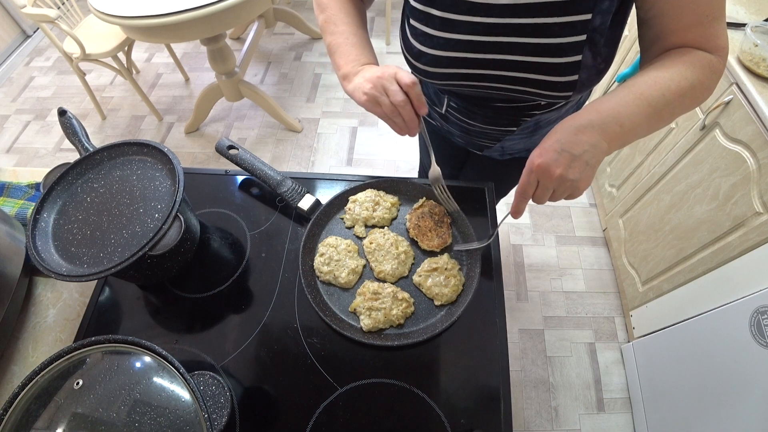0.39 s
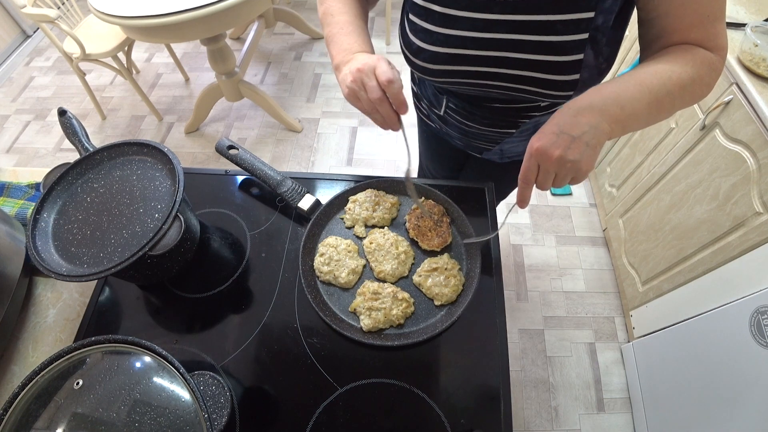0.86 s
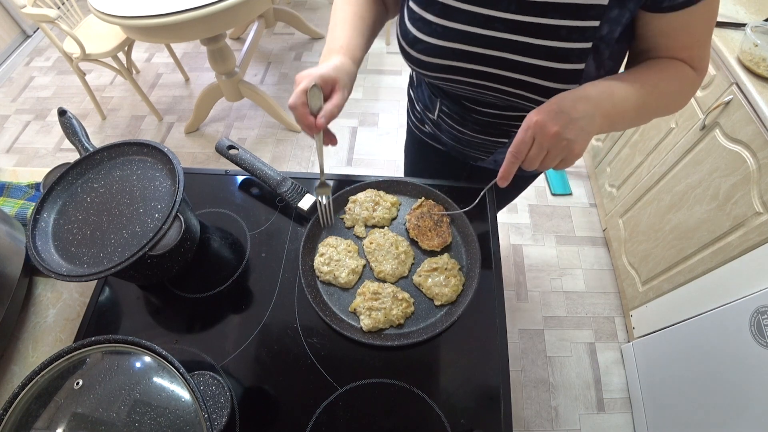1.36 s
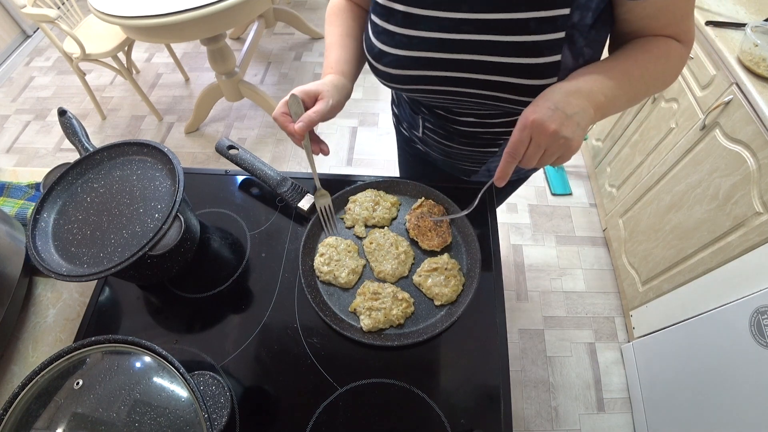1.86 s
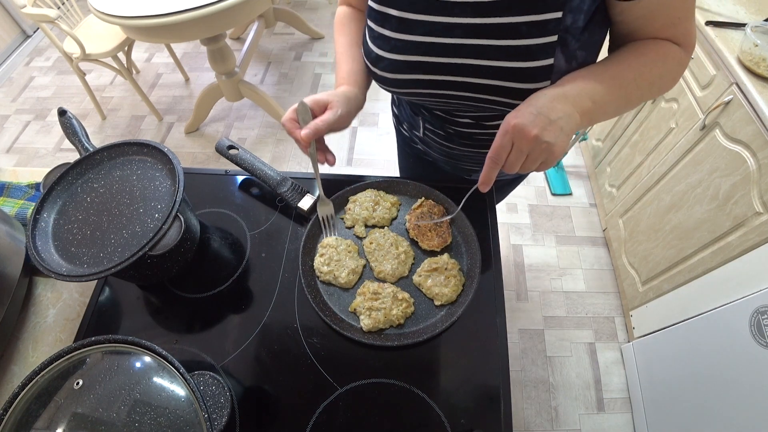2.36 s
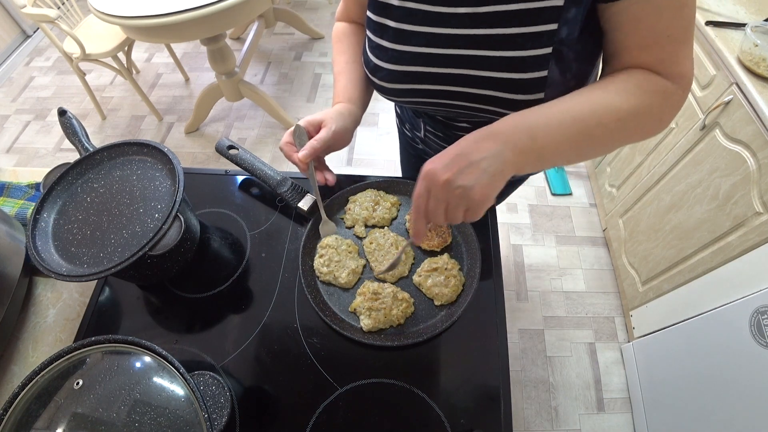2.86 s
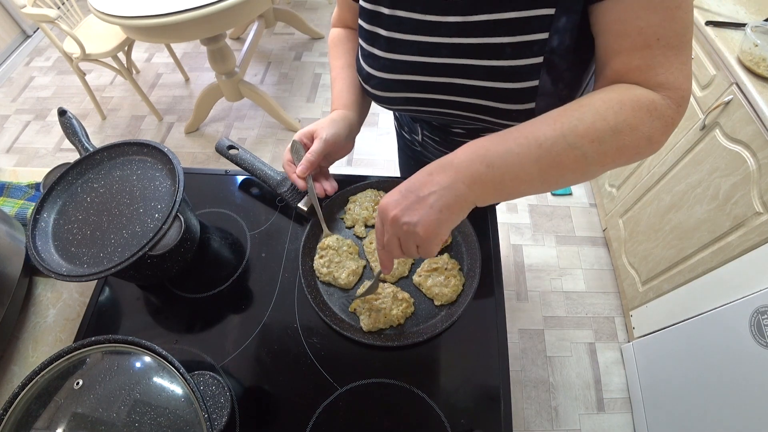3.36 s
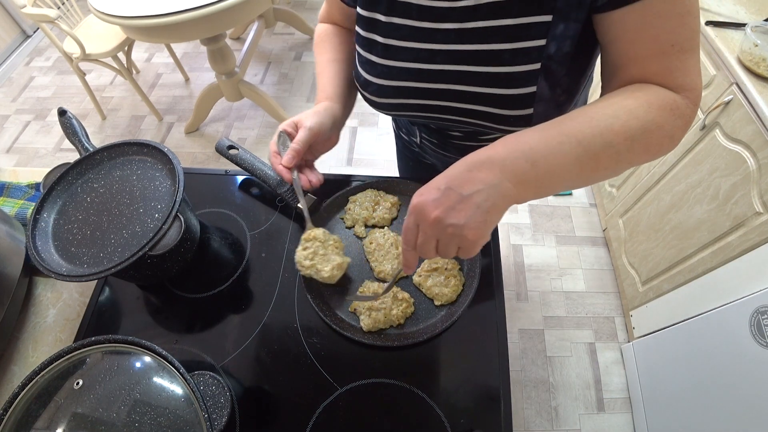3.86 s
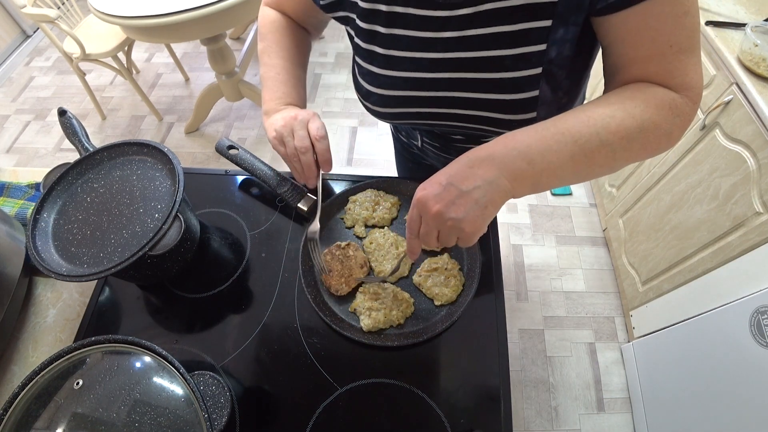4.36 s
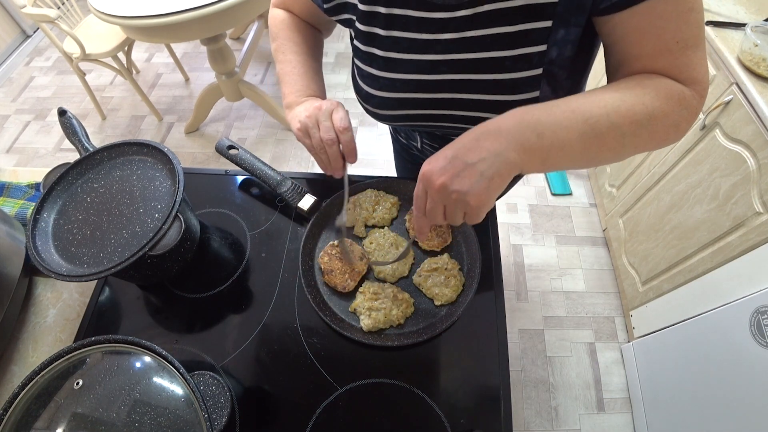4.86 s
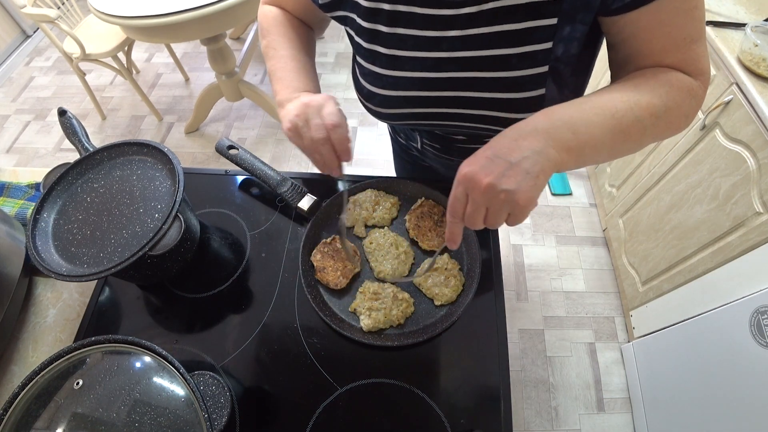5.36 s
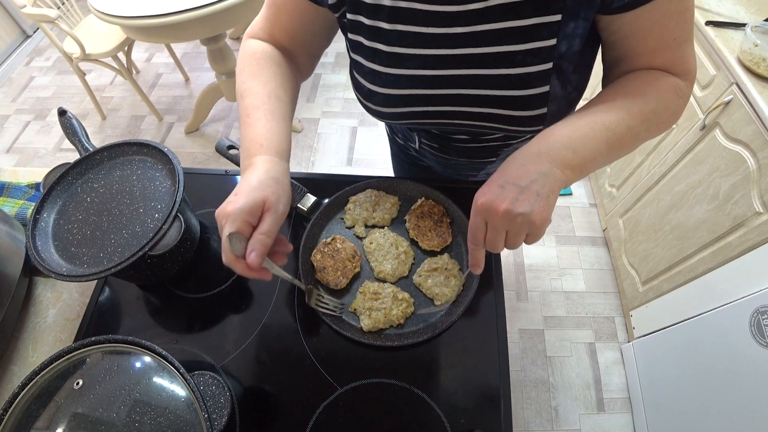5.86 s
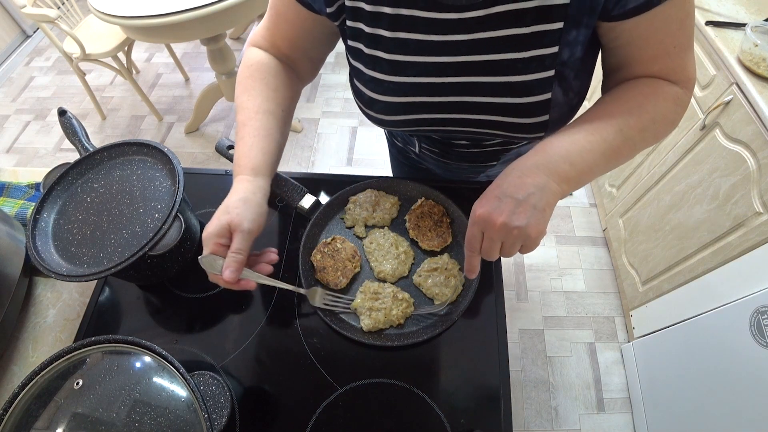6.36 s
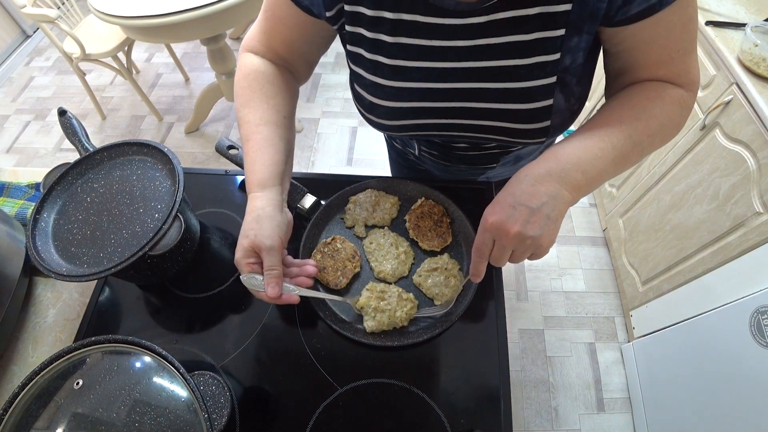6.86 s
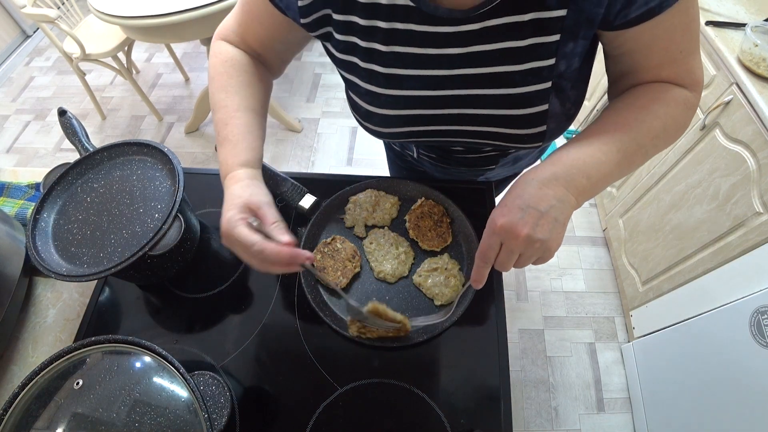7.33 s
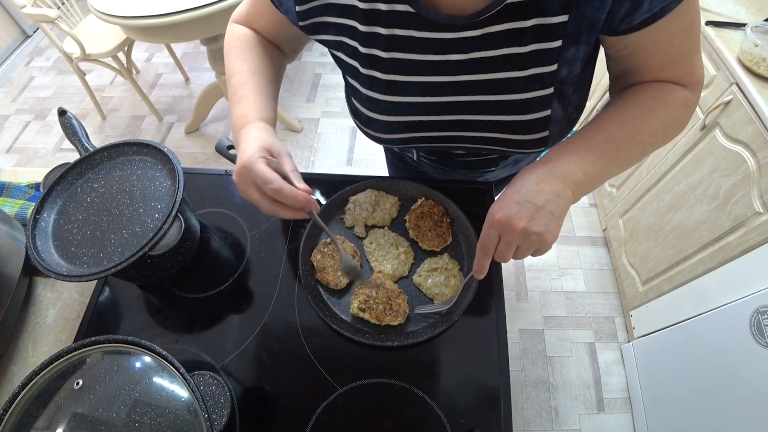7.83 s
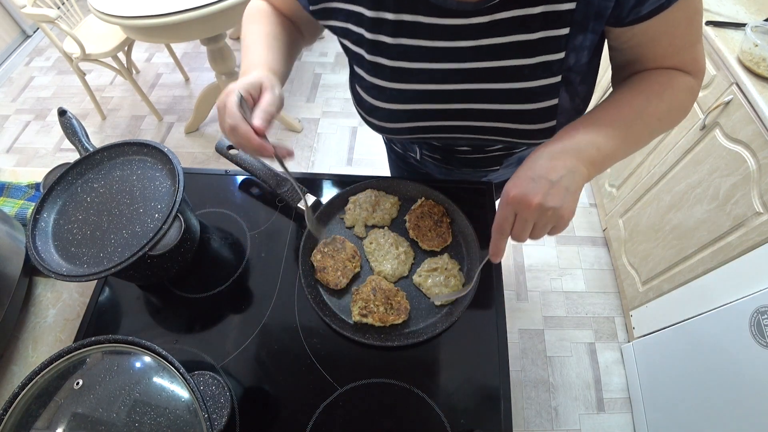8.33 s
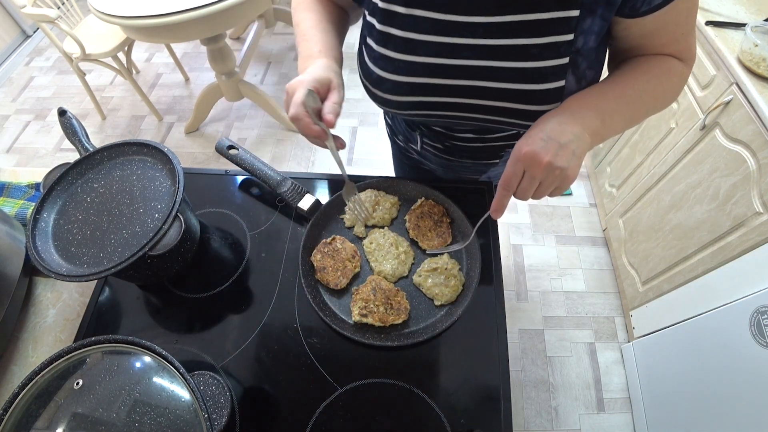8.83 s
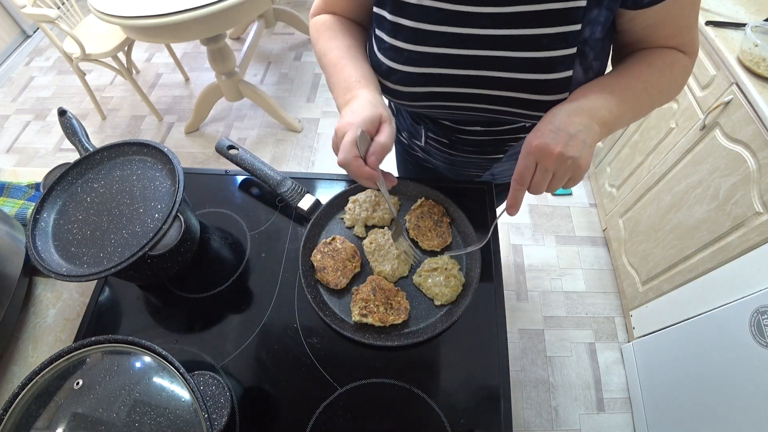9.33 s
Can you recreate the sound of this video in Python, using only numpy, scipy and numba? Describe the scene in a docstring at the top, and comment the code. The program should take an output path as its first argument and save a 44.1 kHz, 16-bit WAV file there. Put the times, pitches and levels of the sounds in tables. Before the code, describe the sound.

Close, bright frying crackle swells and eases as fritters are flipped, dotted with crisp pops and small metallic utensil knocks in a quiet kitchen.

```python
"""A kitchen, heard in stereo close above a pan of frying fritters. Steam bubbles burst as thousands of tiny damped
sines over hiss, a crackle that flares when a fritter is turned and then dies down. Drops pop as short clicks
with a patter of droplets; forks tap and scrape the pan and the hob thuds, as noisy contacts ringing decaying modes.
A fridge hums as wavering sines over low room rumble of filtered noise."""
import sys
import numpy as np
from scipy import signal
from scipy.fft import rfft, irfft
from scipy.io import wavfile
from scipy.ndimage import uniform_filter1d
from numba import njit

SR = 44100
rng = np.random.default_rng(int(sys.argv[2]) if len(sys.argv) > 2 else 0)


def boost_factor(decibels):
    """Convert a level in decibels to a linear amplitude factor."""
    exponent = np.asarray(decibels, float) / 20
    return 10 ** exponent


def bounce(signal):
    """Save signal as a 16-bit WAV file at the path given by the first command-line argument."""
    frames = np.transpose(np.atleast_2d(signal))
    limited = np.clip(frames, -1, 1)
    pcm = np.round(limited * 32767).astype(np.int16)
    wavfile.write(sys.argv[1], SR, pcm)


N = 428211


def colour(x, points):
    """Minimum-phase filter through (Hz, dB) points, from the cepstrum of the log gain."""
    size = 2 ** 15
    hz, db = np.transpose(points)
    bin_hz = np.arange(size // 2 + 1) * SR / size
    gain_db = np.interp(np.log(bin_hz + 1), np.log(hz), db)
    cepstrum = irfft(np.log(boost_factor(gain_db)))
    # fold onto positive time: causal
    cepstrum[1:size // 2] *= 2
    cepstrum[size // 2 + 1:] = 0
    response = irfft(np.exp(rfft(cepstrum)))[None, :size // 2]
    return signal.fftconvolve(np.atleast_2d(x), response, axes=1)[:, :N]


def walk(rate_hz):
    """Random levels held 1 / rate_hz s and slewed twice; rms 1."""
    hold = int(SR / rate_hz)
    steps = np.repeat(rng.standard_normal(N // 50)[:N // hold + 1], hold)
    smooth = uniform_filter1d(uniform_filter1d(steps, hold), hold)[:N]
    return smooth / np.sqrt(np.mean(smooth ** 2))


@njit
def grains(start_s, hz, tau_s, size):
    """Each grain is a damped sine that starts between samples."""
    out = np.zeros(N)
    for k in range(len(start_s)):
        first = int(start_s[k] * SR) + 1
        rate = 2j * np.pi * hz[k] / SR - 1 / (tau_s[k] * SR)
        z = size[k] * np.exp(rate * (first - start_s[k] * SR))
        turn = np.exp(rate)
        for j in range(first, min(N, first + int(6 * tau_s[k] * SR))):
            out[j] += z.imag
            z *= turn
    return out


def ring(modes, tilt_db):
    """Half a second of decaying cosines: the modes' answer to one blow."""
    t = np.arange(SR // 2) / SR
    hz, db, t60_s = np.transpose(modes)[:, :, None]
    level_db = db + tilt_db(hz) - 60 * t / t60_s
    return np.sum(boost_factor(level_db) * np.cos(2 * np.pi * hz * t), axis=0)


# Echoes off pan wall and hob. Each row: delay left in s, delay right in s, level re direct in dB.
ECHOES = [(.0009, 0.0013, -33), (.0017, 0.0013, -51.5), (.0023, 0.002, -18)]
ROOM_T60_S, ROOM_DB = 0.23, -12


def kitchen(x):
    """Direct sound, close echoes, and a diffuse decaying tail that differs between the ears."""
    t = np.arange(SR // 2) / SR
    build_up = 1 - np.exp(-t / 0.0052)
    tail = rng.standard_normal((2, len(t))) * boost_factor(-60 * t / ROOM_T60_S) * build_up
    tail = signal.lfilter([1], [1, -.5], tail)  # walls soak up treble
    response = boost_factor(ROOM_DB) * tail / np.sqrt(np.sum(tail ** 2, axis=1, keepdims=True))
    response[:, 0] = 1
    for *delay_s, db in ECHOES:
        delay = SR * np.array(delay_s)[:, None]
        response[:, :200] += boost_factor(db) * np.sinc(np.arange(200) - delay)
    return signal.fftconvolve(x[None], response, axes=1)[:, :N]


# Fritters landing raw side down. Each row: start in s, settling in s, flash of steam in dB, flash length in s,
# simmer in dB, cooling in dB per s, left minus right in dB.
FLIPS = [(0, 0.043, -28, 0.084, -29, 4, -0.8), (4.248, 0.025, -33.5, 0.61, -31.5, 2.5, 0.4),
         (7.387, 0.23, -34, 0.92, -30.5, 2, -0.1)]
# Tilt of each flash to small bright bubbles. Each entry: tilt in dB per half of the pitch range.
FLASH_TILT_DB = [14, 17, 4.5]
# A fork prises a fritter loose; the first time the sizzle dips by 2 dB, the second it keeps its level.
# Each row: start in s, end in s, level change in dB.
LIFTS = [(3.013, 3.98, -2), (6.797, 7.245, 0)]
LIFT_S = 0.067
FLASH_DIES_DB_PER_S, REST_DB = 38, -41


def heat():
    """Sizzle level, tilt and place: each landing flashes, then simmers and cools over the rest of the pan."""
    t = np.arange(N) / SR
    s, settle_s, flash_db, lasts_s, simmer_db, cools_db_per_s, balance_db = np.transpose(FLIPS)[:, :, None]
    landed = ((t - s) / settle_s).clip(0, 1) ** 2
    dying_db = FLASH_DIES_DB_PER_S * (t - s - lasts_s).clip(0)
    flash = landed * boost_factor(flash_db - dying_db) ** 2
    simmer = landed * boost_factor(simmer_db - cools_db_per_s * (t - s).clip(0)) ** 2
    fritter = flash + simmer
    power = fritter.sum(axis=0) + boost_factor(REST_DB) ** 2
    lift_db = sum(db * np.interp(t, [a, a + LIFT_S, b, b + LIFT_S], [0, 1, 1, 0]) for a, b, db in LIFTS)
    level_db = 10 * np.log10(power) + lift_db
    tilt_db = np.dot(FLASH_TILT_DB, flash) / power
    return level_db, tilt_db, np.sum(balance_db * fritter, axis=0) / power


# Colour of a burst as pan and microphone pass it. Each row: frequency in Hz, gain in dB.
BURST = [(300, -52.5), (550, -34), (690, -26), (1000, -15.5), (1450, -19), (2100, -15), (2750, -13),
         (3100, -12.5), (3550, -7.5), (3900, -7.5), (5000, -3.5), (6000, -1.5), (7400, 0.5), (8800, -4),
         (10900, -4.5), (14000, -22)]
# Pan resonances, also rung by the forks. Each row: frequency in Hz, relative level in dB, t60 in s.
PAN_MODES = [(253, 6, 0.051), (376, -10.5, 0.02), (447, 10, 0.0067), (546, -3.5, 0.018), (813, -3, 0.076),
             (1115, 9, 0.011), (1350, -9, 0.035), (1712, -2.5, 0.041), (1875, -3.5, 0.053),
             (2090, 3, 0.019), (2394, -4, 0.035), (3045, 2, 0.015), (3770, -5, 0.056), (4155, 2.5, 0.03),
             (4620, -3, 0.023), (5030, -9.5, 0.031), (6050, -1, 0.0093), (7640, -1.5, 0.0075)]
PLACES, BURSTS_PER_PLACE = 4, 14000


def sizzle(level_db, tilt_db):
    """Thousands of tiny bursts a second over steam hiss; hot fat bursts evenly, cooling fat in scattered spits."""
    cool_db = level_db.max() - level_db
    # a spit starts at once and dies within a few ms
    spit_s, spit_luck = rng.random((1500, 2)).T
    spit_size = boost_factor(-5.0 * np.log(spit_luck).clip(-3))
    spits = np.bincount((spit_s * N).astype(int), spit_size, N)
    spits = signal.lfilter([1], [1, -np.exp(-1 / (0.0069 * SR))], spits)
    activity = 3.5 + (0.032 + 0.086 * cool_db) * spits
    when, pitch, luck, sign = np.moveaxis(rng.random((PLACES, BURSTS_PER_PLACE, 4)), 2, 0)
    at = (when * N).astype(int)
    # a few bursts are much larger than the rest, more so in cooling fat
    luck_db = -(3.5 + 0.047 * cool_db[at]) * np.log(luck)
    burst_db = np.minimum(luck_db, 11.5 + .5 * cool_db[at]) + 2 * (pitch - 1.0) * tilt_db[at]
    size = boost_factor(burst_db) * activity[at] * np.sign(sign - .5)
    crackle = np.array([grains(w * N / SR, 600 + 13000 * p, .00008 + 0 * w, z)
                        for w, p, z in zip(when, pitch, size)])
    # even out the level over 0.2 s
    crackle /= np.sqrt(uniform_filter1d(np.sum(crackle ** 2, axis=0), SR // 5))
    fizz = crackle + boost_factor(-7.0) * rng.standard_normal(crackle.shape)
    # every burst also rings the pan faintly
    pan = ring(PAN_MODES, lambda hz: 1.4 * np.log2(hz / 2000))
    fizz += boost_factor(-40.5) * signal.fftconvolve(fizz, pan[None], axes=1)[:, :N]
    fizz /= np.std(colour(fizz.sum(axis=0), BURST))
    # each place in the pan gets its own diffuse tail
    return colour(sum(kitchen(boost_factor(level_db) * place) for place in fizz), BURST)


# Motor and mains lines. Each row: frequency in Hz, level in dB rms before waver and stereo balance.
HUM = [(32.5, -77), (100, -48.5), (155.5, -60.5), (200, -67.5)]
# Room rumble, mid then side. Each row: frequency in Hz, relative density in dB per Hz.
RUMBLE = [(20, -4.5), (37, -7.5), (45, -22), (60, -1), (77, -18.5), (98, -8), (107, -0.5), (120, -13),
          (160, -10), (250, -18.5), (500, -22), (700, -25.5), (1100, -23), (2500, -26.5), (11000, -37)]
RUMBLE_SIDE = [(20, -35), (100, -25), (200, -24.5), (500, -24.5), (1100, -26.5), (2500, -28), (11000, -31)]
RUMBLE_DB, HUM_WAVER_DB = -48.5, 1.4


def fridge():
    """Motor and mains sines that waver a little, over noise shaped by the room's resonances."""
    t = np.arange(N) / SR
    hum = np.zeros(N)
    for hz, db in HUM:
        level = boost_factor(db + HUM_WAVER_DB * walk(2.92)) * np.sqrt(2)
        hum += level * np.sin(2 * np.pi * (hz * t + rng.random()))
    mid, side = (colour(rng.standard_normal(N), points) for points in (RUMBLE, RUMBLE_SIDE))
    gain = boost_factor(RUMBLE_DB) / np.std(mid)
    return hum + gain * (mid + side * np.array([[1], [-1]]))


# Single pops at set times. Each row: time in s, nominal peak in dB, pitch in Hz, droplets re click in dB.
POPS = [(0.0904, -10, 7180, -8), (0.1394, -14, 7160, -8), (0.5332, -10, 8000, -8), (0.5917, -8, 6000, -5),
        (0.7682, -9, 9600, -8), (1.2195, -13, 7860, -8), (1.4551, -8.5, 7200, -8),
        (1.5758, -11.5, 7100, -6.5), (1.6886, -14, 6160, -8), (1.709, -14, 7300, -6),
        (2.0362, -9.5, 6900, -3), (2.1104, -14, 7310, -8), (2.332, -14.5, 7600, -4),
        (2.467, -13, 6300, -10), (2.592, -18, 5950, -8), (2.686, -22, 5480, -8), (2.7102, -13.5, 5590, -8),
        (2.7417, -14, 7700, -8), (2.8383, -8, 7300, -2), (3.1758, -14.5, 7880, -10),
        (3.4146, -20, 7350, -8), (3.459, -16, 4120, -8), (3.755, -9.5, 8740, -12), (3.8717, -20, 6650, -8),
        (3.894, -15.5, 5990, -5), (3.9265, -16, 6500, -5), (4.123, -16, 6610, -8), (4.1347, -10, 6100, -11),
        (4.3506, -12, 7800, -2), (4.4004, -7, 7200, -4), (4.5942, -12, 7320, -1), (4.6324, -12, 5100, -8),
        (4.9407, -12, 7340, -8), (4.9783, -3, 7300, -8), (5.5157, -12, 7340, -8), (5.5279, -9, 7400, -8),
        (5.8217, -21, 7250, -8), (6.0611, -22, 6700, -10), (6.1466, -7, 8700, -7),
        (6.7082, -11.5, 7370, -8), (7.3656, -13, 7300, -8), (8.0113, -8.5, 7590, -8),
        (8.196, -11, 6300, -6), (8.858, -12, 6870, -8), (8.8847, -12, 5100, -8), (8.9371, -10, 8010, -8),
        (9.0807, -10.5, 5980, -9), (9.1624, -11, 6350, -8), (9.1993, -11, 5800, -8),
        (9.3511, -11, 6630, -8), (9.3825, -10, 5980, -2), (9.5477, -11, 7710, -8)]
# more pops at random, level following the sizzle: base level over it, scatter upwards, pitch range
STRAY_POPS, STRAY_DB, STRAY_SCATTER_DB, STRAY_LOW_HZ, STRAY_HIGH_HZ = 160, 12, 4, 4500, 9850
# each click starts this many s after its row's time; pitch, decay and level of its bright snap
CLICK_LAG_S, SNAP_HZ, SNAP_S, SNAP_DB = 0.0013, 10200, .00005, -2


def click(s, db, hz):
    """Two damped sines that start together: a cycle or two at the pop's pitch and a short bright snap."""
    s = s + CLICK_LAG_S
    cycle = grains(s, hz, 0.36 / hz, boost_factor(db))
    return cycle + grains(s, SNAP_HZ + 0 * s, SNAP_S + 0 * s, boost_factor(db + SNAP_DB))


def pops(level_db):
    """A bubble clicks for a cycle or two; its droplets patter down over the next few ms."""
    when, luck, pitch, wet = rng.random((STRAY_POPS, 4)).T
    stray_db = level_db[(when * N).astype(int)] + STRAY_DB - STRAY_SCATTER_DB * np.log(luck).clip(-1.5)
    stray_hz = STRAY_LOW_HZ + (STRAY_HIGH_HZ - STRAY_LOW_HZ) * pitch
    strays = [when * N / SR, stray_db, stray_hz, -6 - 10 * wet]
    s, db, hz, patter_db = np.hstack([strays, np.transpose(POPS)])[:, :, None]
    lag, pitch, luck = np.moveaxis(rng.random((len(s), 12, 3)), 2, 0)
    lag_s = -.003 * np.log(lag)
    drop_db = db + patter_db - 1500 * lag_s - 10.0 * luck
    drop_hz = hz * (.6 + 1.1 * pitch)
    drop_s = s + 0.0019 + lag_s
    patter = grains(drop_s.ravel(), drop_hz.ravel(), 0.5 / drop_hz.ravel(), boost_factor(drop_db).ravel())
    # a click of median pitch at 0 dB peaks at 1 before the room
    typical = colour(click(np.zeros(1), np.zeros(1), np.median(hz, axis=0)), BURST)
    clicks = click(s[:, 0], db[:, 0], hz[:, 0])
    return colour(kitchen(clicks + patter), BURST) / np.abs(typical).max()


def knocks(events, modes, spread, rough_db, dry_db, dry_cycles):
    """A ragged, weakening contact makes a dry rasp and rings the modes nearest the pitch it excites."""
    out, t = np.zeros(N), np.arange(SR // 2) / SR
    for s, db, centre_hz, length_s in events:
        chance = rng.standard_normal(len(t))
        length_s = max(length_s, .0005)
        contact = chance * boost_factor(rough_db * np.abs(chance) - 3.5 * t / length_s) * (t <= length_s)
        contact[0] = 7.9  # firm first touch
        # a duller blow is a softer, longer push
        contact = np.convolve(contact, np.hanning(3 + int(.3 * SR / centre_hz)))[:len(t)]
        rasp = boost_factor(dry_db) * np.sin(2 * np.pi * centre_hz * t) * np.exp(-t * centre_hz / dry_cycles)
        body = ring(modes, lambda hz: -spread * np.log2(hz / centre_hz) ** 2)
        hit = signal.fftconvolve(contact, rasp + body)[:len(t)]
        i = int(s * SR)
        out[i:i + len(t)] += (boost_factor(db) * hit / np.abs(hit).max())[:N - i]
    return out


# Fork on the pan. Each row: start in s, peak in dB before room and balance, pitch excited most in Hz,
# contact length in s.
TAPS = [(.391, -38, 450, 0.023), (.45, -41.5, 294, 0.024), (.539, -43, 493, 0.016), (.589, -39, 503, 0.024),
        (.662, -36, 1100, 0.011), (1.455, -34, 2000, 0.014), (1.91, -37.5, 855, 0.034),
        (2.329, -40, 840, 0.01), (2.712, -29, 3000, 0.0016), (3.262, -38, 1100, 0.0095),
        (3.415, -38, 1500, 0.0048), (3.461, -35.5, 2500, 0.0103), (4.4, -28, 2050, 0.0033),
        (5.318, -31.5, 1000, 0.027), (5.34, -34.5, 1300, 0.037), (5.372, -35, 1050, 0.043),
        (5.757, -35.5, 700, 0.023), (5.778, -30.5, 700, 0.018), (5.788, -34, 1490, .045),
        (6.146, -36.5, 1500, 0.0078), (6.5735, -30, 1450, 0.0055), (7.772, -38, 1050, 0.013),
        (9.37, -36, 2020, 0.027)]


def forks():
    """Taps and scrapes: rough contacts ring the pan, heard through the room."""
    return kitchen(knocks(TAPS, PAN_MODES, spread=9, rough_db=2.5, dry_db=16, dry_cycles=0.25))


# Dull bumps. Each row: start in s, peak in dB before balance, pitch excited most in Hz, contact length in s.
THUDS = [(3.268, -28.5, 182, 0.011), (4.17, -37.5, 144, 0.025), (5.783, -26, 55.4, .012),
         (5.905, -37, 116, 0.012), (6.039, -33.5, 171, .02), (9.5, -47, 143, .02)]
# Hob resonances. Each row: frequency in Hz, relative level in dB, t60 in s.
HOB_MODES = [(38, -9, .25), (57, 3, 0.28), (108, 4, 0.31), (146, 7, 0.32), (173, 5.5, 0.027),
             (254, 6.5, 0.091), (334, 7, 0.098), (403, -9, 0.3)]


def hob():
    """Dull bumps ring the hob's low modes."""
    return knocks(THUDS, HOB_MODES, spread=6.5, rough_db=0.96, dry_db=8.2, dry_cycles=2.7)


def scene():
    """Frying follows each fritter's place; forks, hob and fridge lean slightly right."""
    level_db, tilt_db, balance_db = heat()
    frying = sizzle(level_db, tilt_db) + pops(level_db)
    frying = frying * boost_factor([balance_db / 2, -balance_db / 2])
    return frying + (forks() + hob() + fridge()) * boost_factor([[-.4], [.4]])


def top_cut(x):
    """Nothing passes above the cut-off."""
    return signal.sosfilt(signal.butter(12, 12270, fs=SR, output="sos"), x)


def record(dry):
    """The recorder cuts the top steeply, by an elliptic low-pass."""
    top_hz = 10986
    low_pass = signal.ellip(10, .3, 54, top_hz, fs=SR, output="sos")
    mix = signal.sosfilt(low_pass, dry)
    return top_cut(mix)


dry = scene()
out = record(dry)
bounce(out)
```